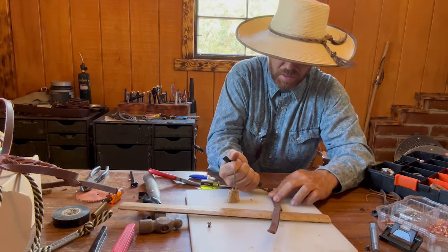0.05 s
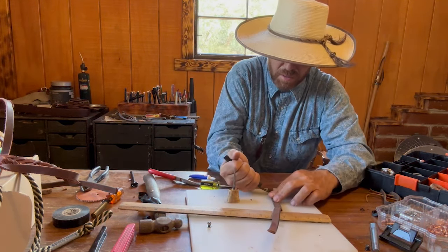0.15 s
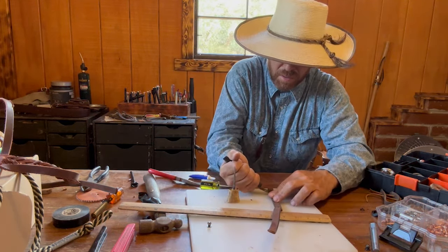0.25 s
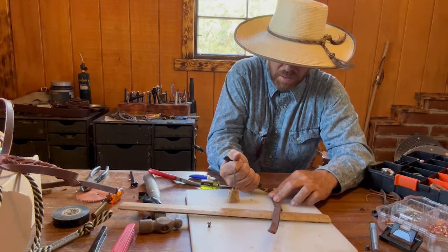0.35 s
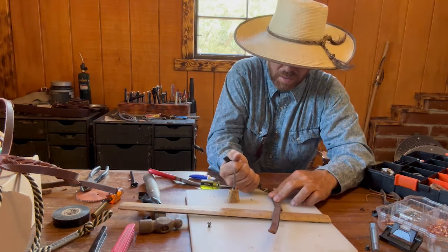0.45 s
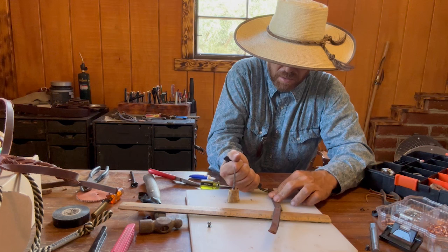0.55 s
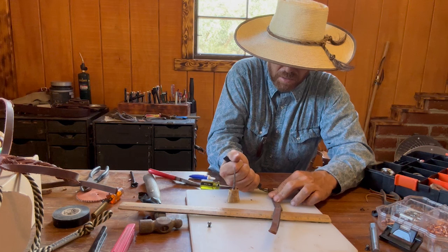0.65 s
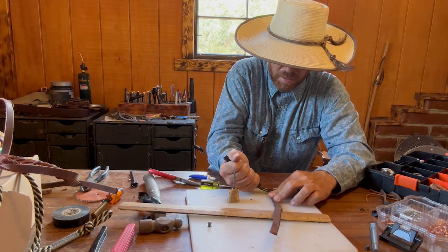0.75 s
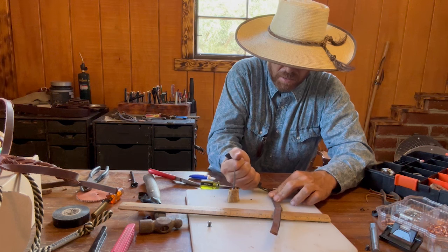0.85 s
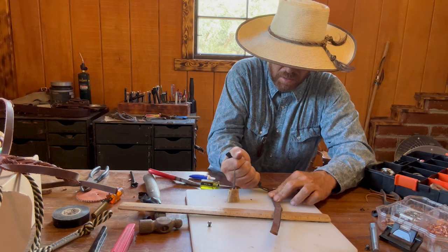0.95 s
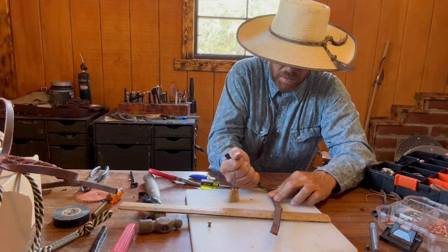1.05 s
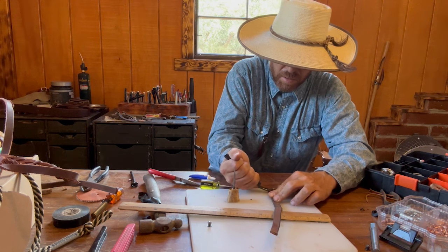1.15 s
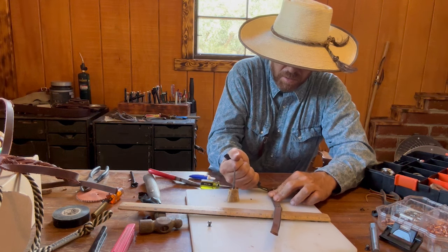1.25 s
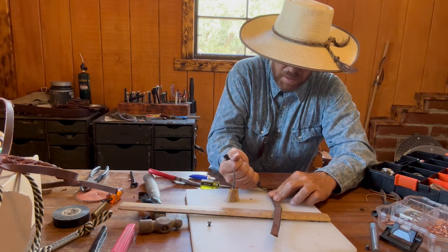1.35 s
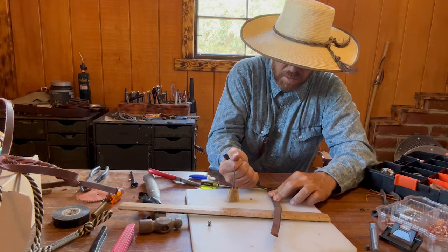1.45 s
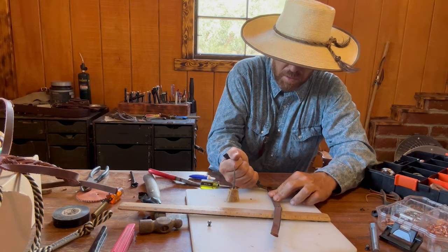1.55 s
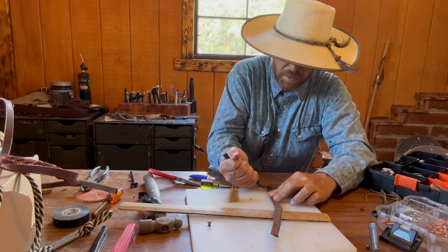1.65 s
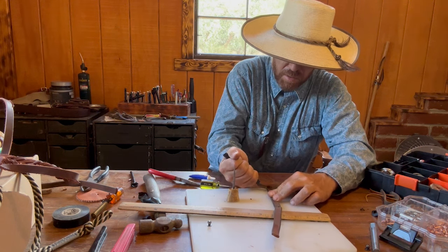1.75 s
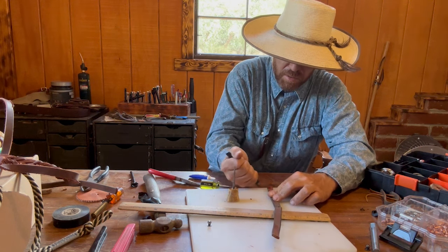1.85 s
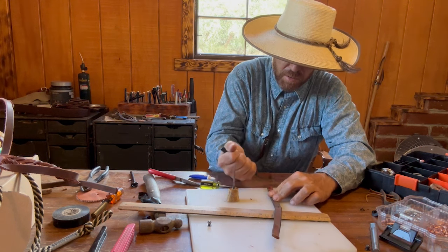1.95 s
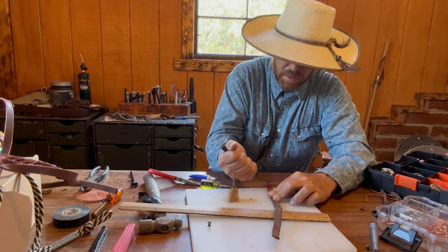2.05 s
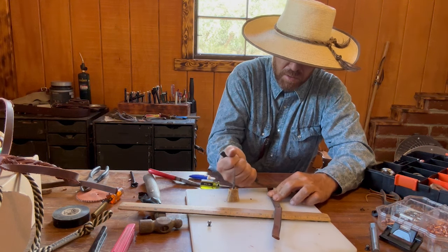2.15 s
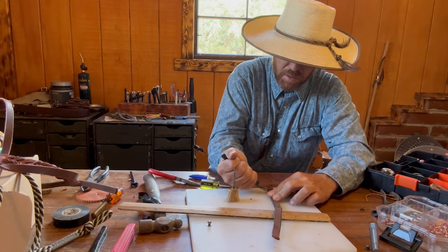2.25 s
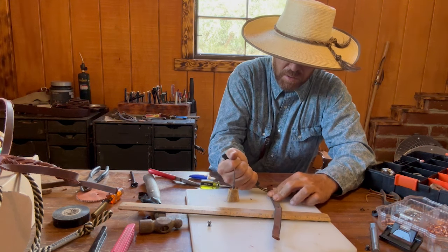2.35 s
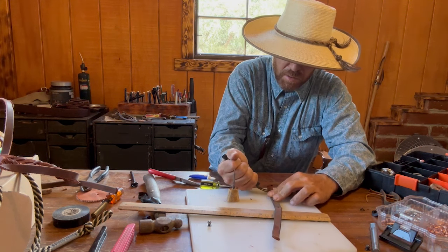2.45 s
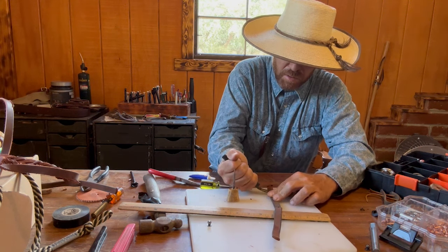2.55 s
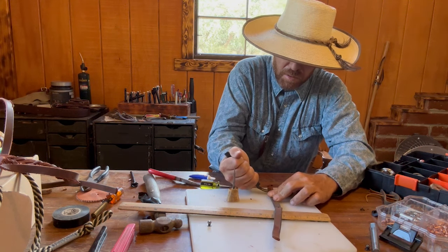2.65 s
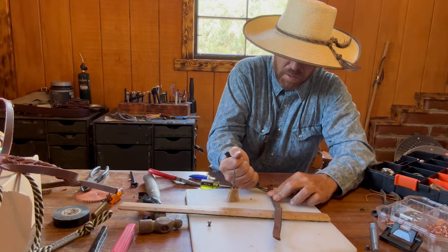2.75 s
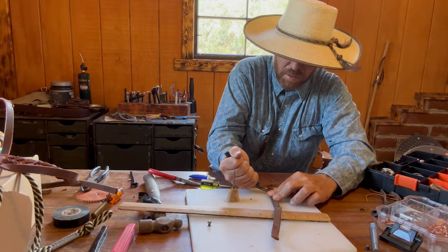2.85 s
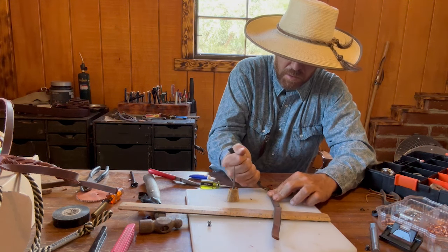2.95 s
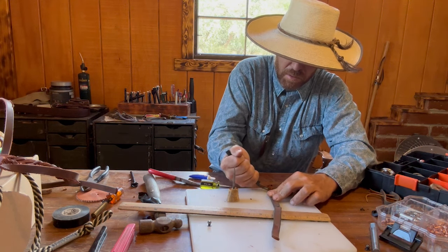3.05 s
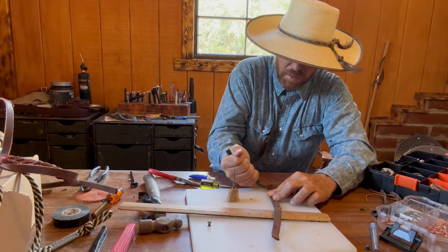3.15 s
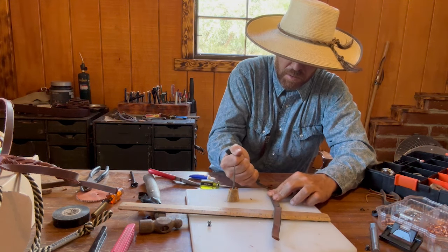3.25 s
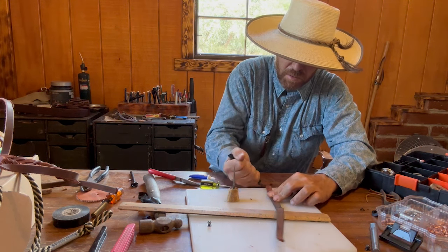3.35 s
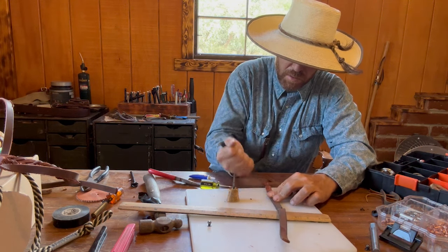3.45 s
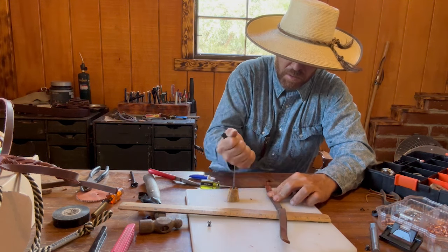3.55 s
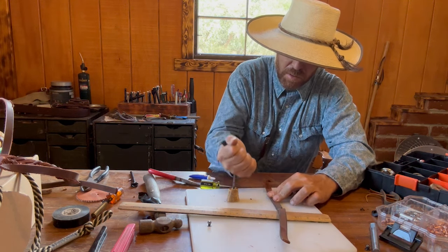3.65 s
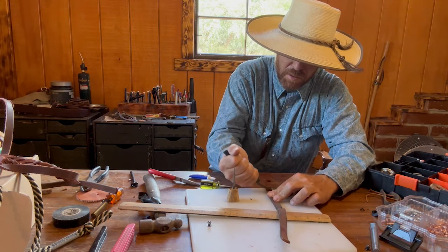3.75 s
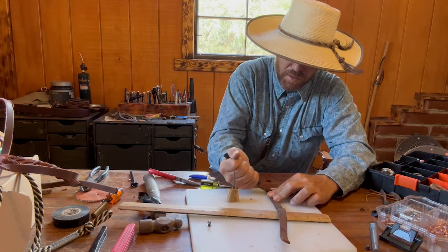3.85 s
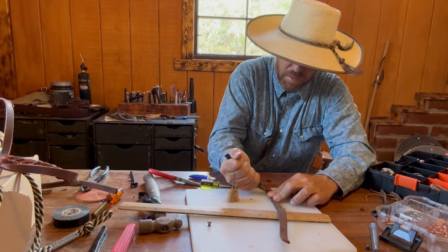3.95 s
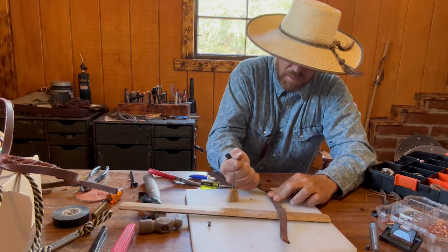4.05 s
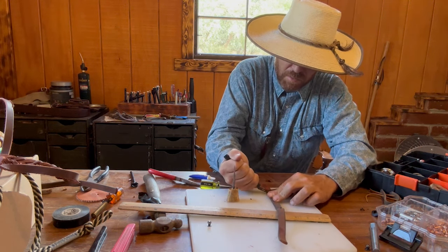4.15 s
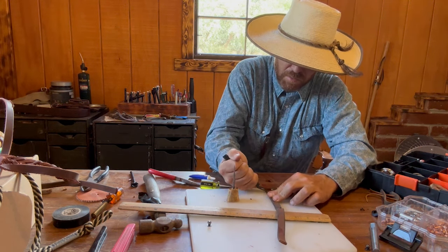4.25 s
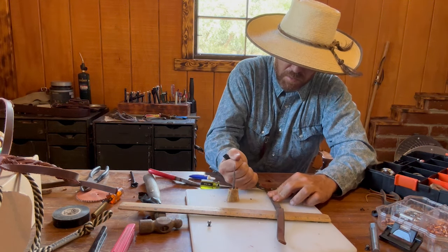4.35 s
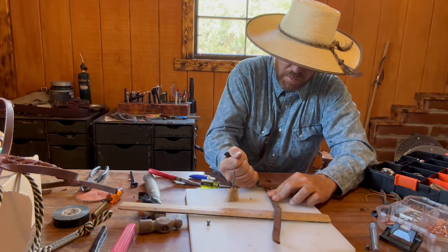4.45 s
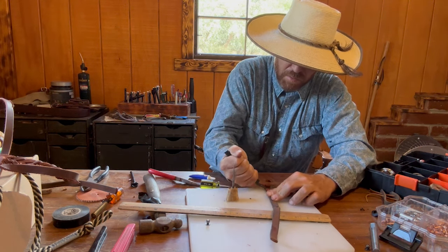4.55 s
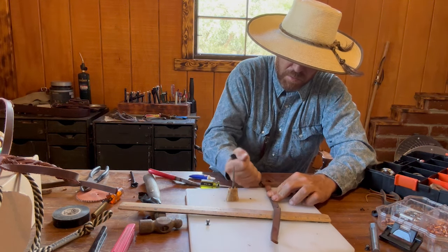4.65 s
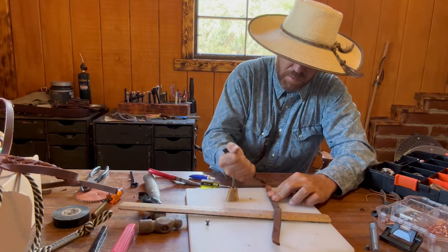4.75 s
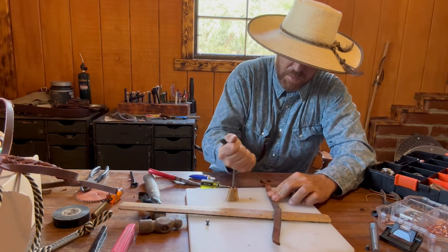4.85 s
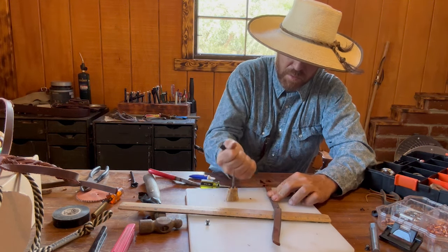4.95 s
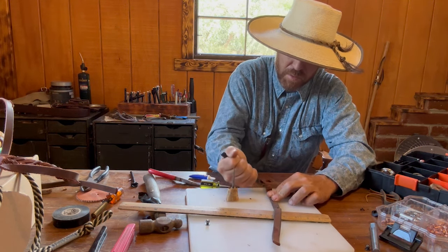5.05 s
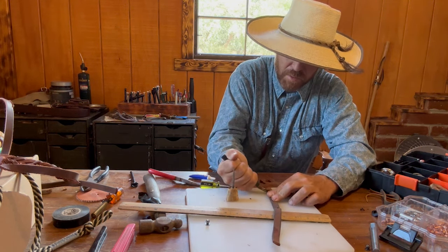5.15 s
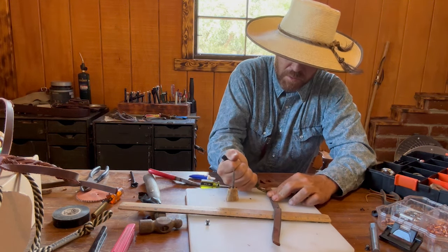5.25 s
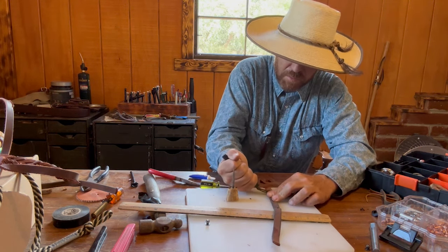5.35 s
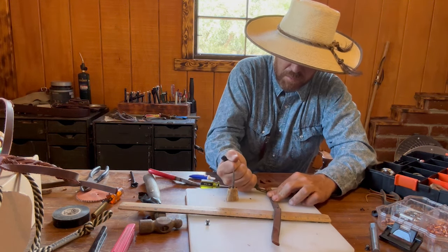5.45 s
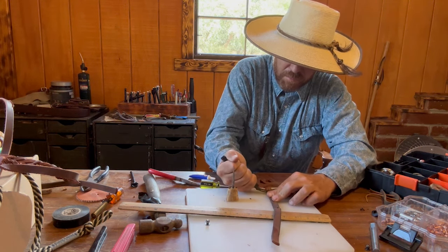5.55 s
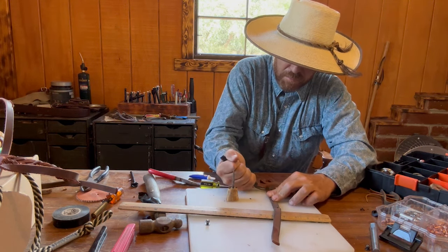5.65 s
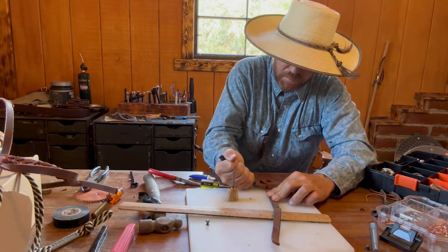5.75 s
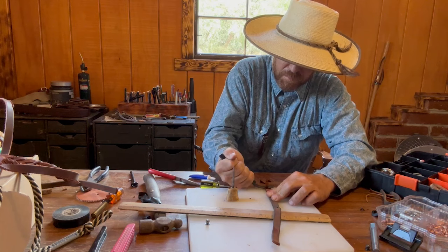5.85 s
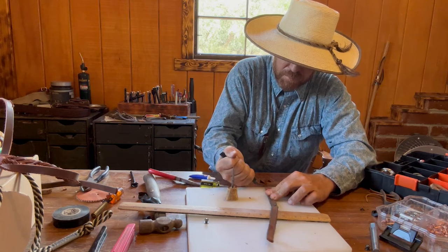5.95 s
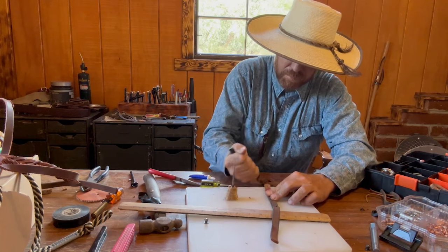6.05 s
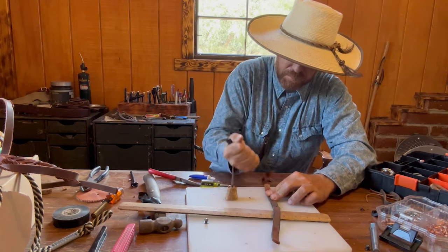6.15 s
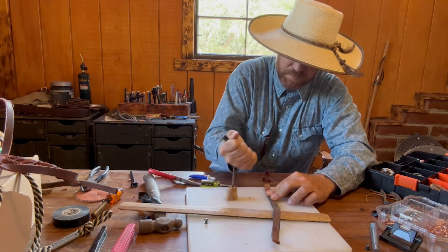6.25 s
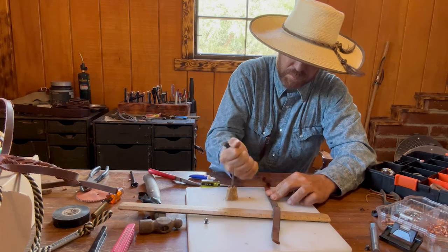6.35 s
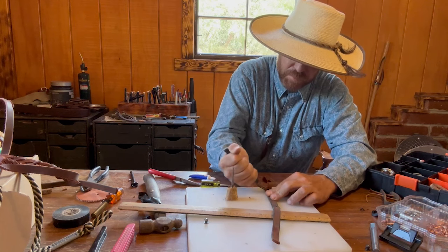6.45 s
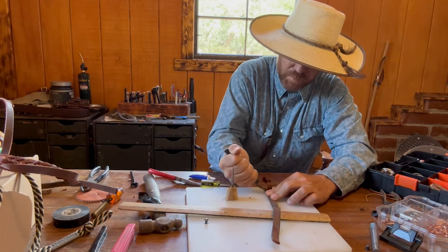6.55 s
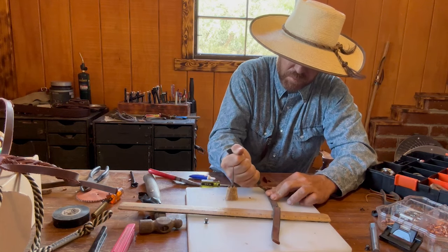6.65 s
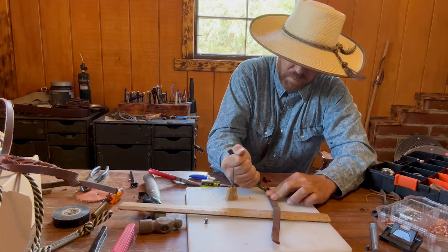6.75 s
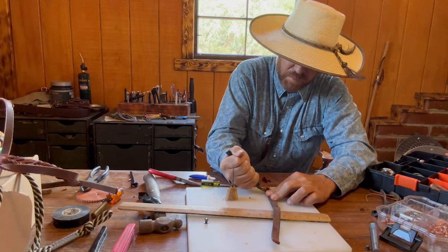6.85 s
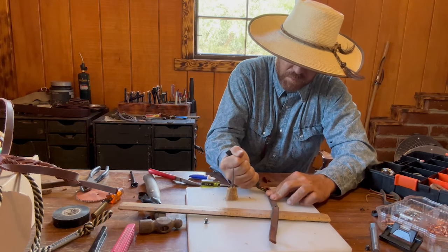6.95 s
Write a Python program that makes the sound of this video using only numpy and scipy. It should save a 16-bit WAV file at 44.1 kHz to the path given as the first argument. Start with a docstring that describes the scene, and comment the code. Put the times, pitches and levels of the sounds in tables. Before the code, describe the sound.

In a small wooden workshop with a faint low room wash and mains hum, a steel hand tool works a leather strap on a board. Light creaks and ticks lead to a firm knock, then three loud cracks spaced over a second apart, each shaking the bench. Soft handling sounds fill the gaps. Close small microphone, short woody room ring.

```python
"""A low wash and a mains hum open the scene, in a small wooden workshop where arms rest on a bench.
A steel hand tool is then worked on a leather strap on a board: it is set down, drags and creaks
through the fibres, breaks through with a crack, knocks the board and is lifted.
Clicks and stick-slip excite damped modes of tool and board; the bench booms under each blow and
wobbles in low swells; sparse decaying echoes let the room ring on."""
import sys
import numpy as np
from scipy import signal
from scipy.io import wavfile
from scipy.ndimage import uniform_filter1d

SR = 44100
rng = np.random.default_rng(int(sys.argv[2]) if len(sys.argv) > 2 else 0)


def put_to_file(sound):
    """Save the sound as 16-bit audio at rate SR, in the file named by the first command-line argument."""
    columns = np.atleast_2d(sound).T  # one column per channel
    safe = np.clip(columns, -1, 1)
    whole_steps = np.round(safe * 32767)
    wavfile.write(sys.argv[1], SR, whole_steps.astype(np.int16))


N = 309141  # length in samples

# Spectral shape of the room noise. Each row: frequency in Hz, relative density in dB per Hz.
WASH_SHAPE = [(15, -26.5), (25, -16.5), (53, -14), (123, -5), (166, -12), (229, -8.5), (317, -9),
              (427, -6.5), (591, -14.5), (1260, -33), (1700, -30), (1840, -38), (3520, -46), (8140, -52),
              (16000, -69.5)]
# Likeness of the noise at the two ports. Each row: frequency in Hz, likeness left to right (0 to 1).
PORT_LIKENESS = [(60, 0.31), (240, 0.39), (950, 0.14), (3770, 0.05), (15000, 0.11)]
# Reverberation time of the room. Each row: frequency in Hz, time to fall by 60 dB in seconds.
ROOM_T60 = [(60, 0.53), (160, 0.61), (420, 0.51), (1100, 0.4), (1900, .42), (2800, 0.5), (3500, 0.47),
            (4300, 0.51), (6000, .46), (8500, 0.39), (12000, 0.21), (15000, 0.19)]
# What the walls return. Each row: frequency in Hz, relative level in dB.
WALL_RETURN = [(60, 2.5), (300, 4.5), (700, 1), (1100, -5.5), (1900, -1), (2800, 2), (3500, 3.5),
               (4300, 0.5), (6000, 0), (9000, -2.5), (12000, -2.9), (15000, -6)]
# Modes of the heavy bench top. Each row: frequency in Hz, width in Hz, relative level in dB.
BENCH_MODES = [(70, 90, -11.5), (141, 15, -3), (185.6, 53, 5), (261, 63, 1), (327.4, 20, -4),
               (357.3, 20, -11.5), (487.8, 56, -2.5)]
# Swells of the low bench wobble, some after blows, others mere random wavering.
# Each row: time of the peak in seconds, level in dB.
WOBBLE_SWELLS = [(0.37, -61), (0.959, -56.5), (1.208, -57), (1.87, -39.5), (2.07, -62.5), (2.891, -59),
                 (3.051, -48), (3.38, -35), (3.5, -47.5), (3.71, -40.5), (3.77, -49), (4.0, -51),
                 (4.179, -50.5), (4.35, -51), (4.7, -29), (4.88, -44), (5.02, -52), (5.23, -54),
                 (5.66, -60), (6.04, -41.5), (6.25, -56), (6.42, -59), (6.749, -50.5), (6.93, -60)]
# Resting arms never keep quite still. Each row: time in seconds, mean level in dB.
RESTING_ARMS = [(0, -60.5), (1.1, -67.5), (2.8, -69), (4.4, -59.5), (7.01, -60)]
# Modes of tool and board ringing together. Each row: frequency in Hz, width in Hz, relative level in dB.
TOOL_MODES = [(692, 200, -1), (827, 210, -9), (1049, 203, 6), (1318, 186, 3.5), (1633, 410, 2),
              (1920, 620, -26.5), (2090, 483, 2), (2709, 280, -2.5), (3385, 230, -11), (4048, 710, 1.5),
              (4900, 1100, 2), (5720, 770, 0), (5800, 730, -26.5), (6520, 800, -2.5), (8200, 1300, 8.5),
              (9200, 2400, -31.5), (12400, 1600, 2), (12900, 1200, -11), (15500, 900, -22.5)]
# Faint rustle of strap and hands between strokes. Each row: time in seconds, relative level in dB.
RUSTLE = [(0, -115), (2.4, -115), (2.55, -104), (2.95, -97), (3.9, -95.5), (4.12, -90), (4.2, -100),
          (5.2, -97.5), (6.8, -100), (6.92, -94.5), (7.01, -92.5)]
# The blade catches and drags. Each row: time of the peak in seconds, swell in seconds,
# relative level in dB, fade in dB per second, treble against the body in dB.
DRAGS = [(0.73, .04, -87.5, 199.5, -2), (0.938, 0.043, -81, 420, 1.5), (1.228, 0.049, -87.5, 110.5, -5.5),
         (1.384, .018, -80, 185.5, 1.7), (1.572, 0.047, -76, 431, 2.5), (1.789, 0.0064, -70.5, 90, 0.2),
         (2.984, 0.015, -68, 173, 0.1), (3.15, .08, -83, 61, 4), (3.192, 0.012, -79, 499, 3),
         (3.231, .004, -69, 601, -5.5), (3.29, 0.018, -77, 61, -5), (3.304, .004, -70.5, 100.5, -2),
         (3.803, .006, -81, 230.5, 3.5), (4.186, .004, -76, 360.5, 8), (4.224, 0.0099, -69, 159.5, 1.5),
         (4.4, .08, -84, 61, 5.5), (4.439, .004, -78.5, 47.5, 3), (4.535, 0.0036, -73.5, 231.5, -1.7),
         (5.088, .006, -83, 119.5, -2), (5.41, 0.069, -87, 188, -10), (5.56, 0.025, -78.5, 600.5, 2.8),
         (5.644, .01, -60.5, 150.5, -3.1), (5.71, 0.058, -75, 301.5, 3.5), (5.844, .058, -76.5, 99, 0.5),
         (6.483, .006, -76.5, 299, 2), (6.67, .06, -87, 100, -4), (6.79, 0.027, -91, 250.5, -16.5)]
# Blows of the tool. Each row: start in seconds, edge level in dB, then knock, body and sparkle
# in dB against the edge, and the push into the bench in dB.
BLOWS = [(0.746, -57, -18.5, -19.5, -17, -79), (0.935, -54.5, -33.5, 0, -25.5, -56),
         (1.385, -52, -6.5, -16, -17.5, -71), (1.416, -52, -4, -20, -28, -80.5),
         (1.787, -71, 11, 11.5, 6.5, -50.5), (1.837, -20, -5, 2, -14.5, -31.5),
         (2.946, -59, 6, -1.5, 4.5, -57), (2.984, -51, 3, -10.5, 7.5, -38),
         (3.231, -60.5, 11, 10.5, 10.5, -73.5), (3.344, -8, -8.5, -8.5, -9, -25),
         (3.359, -16.5, 0, -11, -1, -42.5), (3.794, -54.5, 7, 5, -3, -51.5),
         (4.183, -67.5, 5.5, 7, 1.5, -53.5), (4.224, -53, 4, 0.2, 12, -41),
         (4.437, -52.5, 3.5, -2.1, 0.3, -53), (4.533, -56.5, 3, -10, -1.7, -51.5),
         (4.655, -8.5, -12, -13.5, -7.5, -33), (4.668, -17.5, 4, -10, 3, -30),
         (5.079, -53, 4.5, 5, -7, -48.5), (5.557, -77, 12, 25.5, 4, -53), (5.644, -49, 6.5, 2, 6, -38.5),
         (5.995, -8.5, -13, -10, -6, -26.5), (6.008, -20, 6.5, 0, -20.5, -35),
         (6.474, -50, 1.4, 2.5, -11, -49.5)]
# Where the colours of a blow lie: knock, body, edge and sparkle, each a frequency in Hz.
COLOUR_HZ = [1040, 1400, 3300, 9000]
# Fibres part one after another. Each row: delay as a share of SPREAD_S, relative level in dB.
SNAPS = [(0, -1.5), (0.448, 4), (1.098, -3), (1.9, -5)]

WASH_DB, HUM_HZ, HUM_DB = -60, 119.7, -65
WOBBLE_HZ = 56.2  # mean pitch of the bench rocking on its legs
WOBBLE_SWELL_S, WOBBLE_FADE_DB_PER_S, REST_SWAY_DB = 0.03, 230, 3
SWELL_DB = 23.5  # depth from which a drag or a wobble swells
RUSTLE_TREBLE_DB, RUSTLE_SWAY_DB = -12, 2.5  # treble against body; rms sway
CRACK_DB = -26  # a short soft swell leads into any blow whose edge is above this
LEAD_IN_S, LEAD_IN_DB, LEAD_IN_TREBLE_DB = 0.028, -41.5, -2.1  # swell; against edge; treble against body
DRAG_AIR_DB = 5.5  # fine slips bring out the modes above 10 kHz
SPREAD_S = .0013  # time scale on which a crack runs through
LEFT_DB = 1.16  # the tool is a little to the left: up at the left port, down at the right
CEILING = .9  # peaks are rounded off from half this level and never pass it
EDGE_HZ = 16200  # upper band limit


def gain_of(db):
    """Logarithmic level: decibels become an amplitude factor."""
    return 10 ** (np.asarray(db) / 20)


def evened(x):
    """Normalisation of power: scales a signal to rms 1."""
    return x / np.sqrt(np.mean(x ** 2) + 1e-20)


def read(points, hz):
    """Interpolation along a logarithmic frequency axis."""
    f, value = np.transpose(points)
    return np.interp(np.log(hz + 1), np.log(f + 1), value)


def drift(shape, size):
    """Low-pass noise: two running means leave a slow random wander of rms 1."""
    once = uniform_filter1d(rng.standard_normal(shape), size)
    return evened(uniform_filter1d(once, size))


def swell_fade(s, db, swell_s, fade):
    """Exponential envelope: a level swells up to db at s, then fades by so many dB a second."""
    t = np.arange(N) / SR - s
    early = np.where(-t > swell_s, 4, 1)  # ahead of the swell, four times as deep in dB
    drop_db = np.where(t > 0, fade * t, -t * early * SWELL_DB / swell_s)
    return gain_of(db - drop_db)


def ring(modes, seconds, phase=0.):
    """Impulse response of a modal body: a row of dying sines, each swelling within a cycle."""
    hz, width, db = np.transpose(modes)[:, :, None]
    t = np.arange(round(seconds * SR)) / SR
    envelope = gain_of(db) * (1 - np.exp(-2.5 * hz * t)) * np.exp(-np.pi * width * t)
    return envelope * np.sin(2 * np.pi * hz * t + phase)


def wash():
    """Diffuse noise: shaped random spectra with drifting patches, plus a slightly wavering hum."""
    frames, hz = N // 512 + 5, np.fft.rfftfreq(1024, 1 / SR)
    a, b, c, d, patches = rng.standard_normal((frames, 513, 5)).T
    patches = uniform_filter1d(patches, 10, 0)  # across frequency
    patches = evened(uniform_filter1d(patches, 7, 1))  # along time
    same = np.clip(read(PORT_LIKENESS, hz), -1, 1)[:, None]
    left = a + 1j * b
    right = same * left + np.sqrt(1 - same ** 2) * (c + 1j * d)
    spectra = np.array([left, right])
    spectra *= gain_of(read(WASH_SHAPE, hz)[:, None] + 1.4 * patches)
    noise = signal.istft(spectra, nperseg=1024, noverlap=512)[1][:, :N]
    waver_db = 1.2 * evened(uniform_filter1d(rng.standard_normal(N), 6000))
    hum_level = np.sqrt(2) * gain_of(HUM_DB + waver_db)
    hum = hum_level * np.sin(2 * np.pi * HUM_HZ * np.arange(N) / SR)
    return gain_of(WASH_DB) * evened(noise) + hum


def room(paths):
    """Reverberation: sparse echoes of random sign, each band dying at its own speed, bass alike at both ports."""
    taps = np.zeros((3, 2, 30000))  # path, port, sample
    at = np.arange(50, 29988, 12)
    at = at + rng.integers(0, 12, (3, 2, len(at)))
    np.put_along_axis(taps, at, rng.choice([-1., 1.], at.shape), 2)
    hz, t, z = signal.stft(taps, SR, nperseg=256)
    same = np.clip(1 - hz / 700, 0, .95)[:, None]
    z[:, 1] = same * z[:, 0] + np.sqrt(1 - same ** 2) * z[:, 1]
    decay_db = 60 * t / read(ROOM_T60, hz)[:, None]
    tail = signal.istft(z * gain_of(read(WALL_RETURN, hz)[:, None] - decay_db), SR, nperseg=256)[1]
    tail = np.float32(tail / np.linalg.norm(tail[0, 0]))
    return signal.fftconvolve(np.float32(paths[:, None]), tail, axes=2).sum(0)[:, :N]


def bench():
    """Forced vibration: pushes make the heavy top boom; a low wobble swells at a wandering pitch."""
    s, push_db = np.transpose(BLOWS)[[0, -1]]
    push = np.zeros(N)
    push[(s * SR).astype(int)] = gain_of(push_db)
    boom = signal.oaconvolve(push, ring(BENCH_MODES, 0.34).sum(0))[:N]
    hz = WOBBLE_HZ * (1 + .26 * drift((2, N), 600))
    alike, unlike = np.sin(2 * np.pi * np.cumsum(hz, axis=1) / SR)
    shake = evened(alike + 0.51 * unlike * [[1], [-1]])  # the second wobble is opposed at the ports
    rest_db = np.interp(np.arange(N) / SR, *np.transpose(RESTING_ARMS))
    rest = gain_of(rest_db + REST_SWAY_DB * drift(N, 3000))
    swells = sum(swell_fade(s, db, WOBBLE_SWELL_S, WOBBLE_FADE_DB_PER_S) for s, db in WOBBLE_SWELLS)
    return boom, shake * (rest + swells)


def heard(phase, turn=0):
    """Directional radiation: each mode at the left port, the right port and along three paths into the room."""
    left = ring(TOOL_MODES, .016, phase)
    # the right port meets the treble from another angle
    lag = 0.43 * np.log2(np.array(TOOL_MODES)[:, :1] / 600)
    right = ring(TOOL_MODES, .016, phase - lag)
    # neighbouring modes, and snaps that follow each other, radiate to different walls
    wall = (np.arange(len(TOOL_MODES))[:, None] + turn) % 3
    to_walls = [left * (wall == k) for k in range(3)]
    return np.array([left * gain_of(LEFT_DB), right / gain_of(LEFT_DB), *to_walls])


def pressure():
    """Friction load in body and treble: rustle, catches of the blade and lead-ins; a crack frees the blade."""
    t = np.arange(N) / SR
    rustle_db = np.interp(t, *np.transpose(RUSTLE)) + RUSTLE_SWAY_DB * drift(N, 2500)
    level = gain_of(rustle_db + np.array([[0], [RUSTLE_TREBLE_DB]]))
    lead_ins = [(s, LEAD_IN_S, db + LEAD_IN_DB, 0, LEAD_IN_TREBLE_DB)
                for s, db, *_ in BLOWS if db > CRACK_DB]
    for s, swell_s, db, fade, treble_db in DRAGS + lead_ins:
        # the next crack ends the drag
        freed = min([crack[0] for crack in lead_ins if crack[0] >= s] + [t[-1]])
        level += swell_fade(s, db, swell_s, fade) * gain_of([[0], [treble_db]]) * (t <= freed)
    return level


def drag(slips_per_s=3000, spread_db=1.0):
    """Stick-slip: dense uneven clicks in clumps, one stream driving the body modes and one the treble."""
    clumps = gain_of([[3.5], [3.5]]) ** evened(uniform_filter1d(rng.standard_normal((2, N)), 500))
    size = gain_of(spread_db * np.minimum(rng.exponential(1, (2, N)), 4))
    size = size * rng.choice([-1., 1.], (2, N))
    slips = evened(clumps * size * (rng.random((2, N)) < slips_per_s / SR))
    body, treble = uniform_filter1d(pressure(), size=60) * slips
    hz = np.array(TOOL_MODES)[:, 0]
    modes = heard(np.pi * np.arange(len(TOOL_MODES))[:, None])  # neighbours in opposite phase
    modes = modes * gain_of(DRAG_AIR_DB * (hz[:, None] > 10000))
    high = hz > 2400
    body_rung = signal.oaconvolve(body[None], modes[:, ~high].sum(1))
    treble_rung = signal.oaconvolve(treble[None], modes[:, high].sum(1))
    return (body_rung + treble_rung)[:, :N]


def blows():
    """Dispersion: bending waves outrun each other, so each snap sweeps down from treble modes to knock."""
    hz = np.array(TOOL_MODES)[:, 0]
    late = np.sqrt(1000 / hz)  # low modes travel slower
    out = np.zeros((5, N + SR))
    chance = rng.random((len(BLOWS), len(SNAPS), 2, len(TOOL_MODES), 1))
    for (s, db, knock_db, body_db, sparkle_db, _), draws in zip(BLOWS, chance):
        colour = np.transpose([COLOUR_HZ, [knock_db, body_db, 0, sparkle_db]])
        strength = gain_of(db + read(colour, hz))[:, None]
        for turn, ((delay, snap_db), (phase, scatter)) in enumerate(zip(SNAPS, draws)):
            snap = gain_of(snap_db - 3.4 * delay * late)[:, None]
            modes = heard(2 * np.pi * phase, turn) * strength * snap
            start = s + SPREAD_S * (delay + 0.59 * late + .3 * scatter[:, 0])
            for k, at in enumerate((start * SR).astype(int)):
                out[:, at:at + modes.shape[2]] += modes[:, k]
    return out[:, :N]


def scene():
    """Superposition: tool and bench, their echo in the room, and the background."""
    boom, shake = bench()
    tool = blows() + drag()
    echo = gain_of(-6.0) * room(tool[2:] + .6 * boom)
    return tool[:2] + boom + echo + shake + wash()


def record(dry):
    """Transducer limits: a small microphone without deep bass, rounded peaks, then the band limit."""
    thin = signal.sosfilt(signal.butter(2, 30, "highpass", fs=SR, output="sos"), dry)
    over = np.maximum(abs(thin) - CEILING / 2, 0)
    held = thin - np.sign(thin) * (over - CEILING / 2 * np.tanh(2 * over / CEILING))
    band = signal.firwin(511, EDGE_HZ, window=("kaiser", 9), fs=SR)
    return signal.oaconvolve(held, band[None], "same")


dry = scene()
out = record(dry)
put_to_file(out)
```